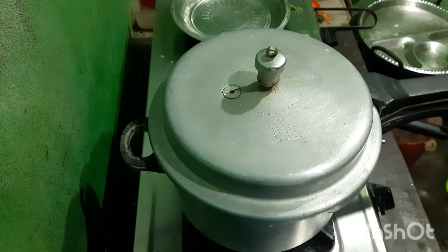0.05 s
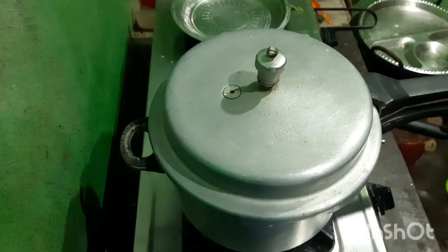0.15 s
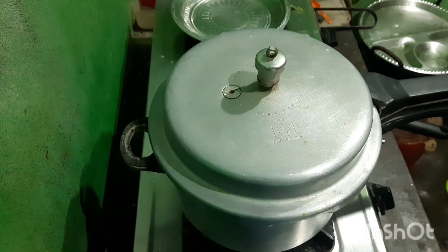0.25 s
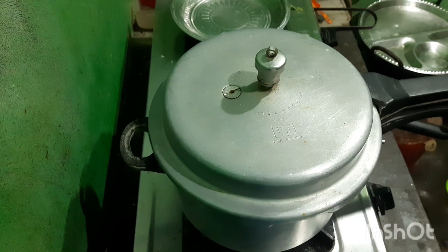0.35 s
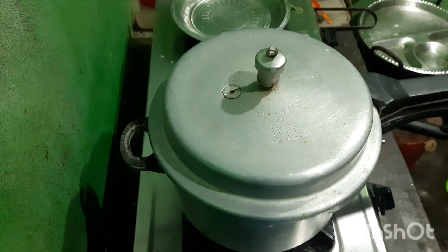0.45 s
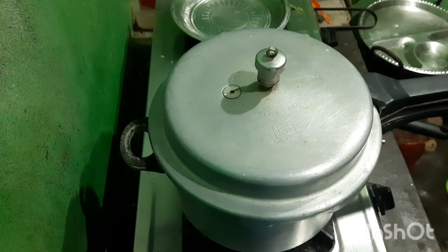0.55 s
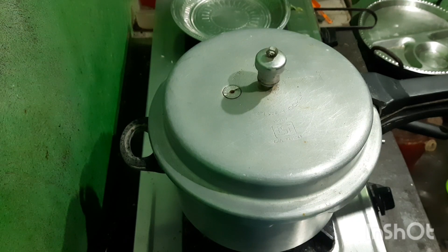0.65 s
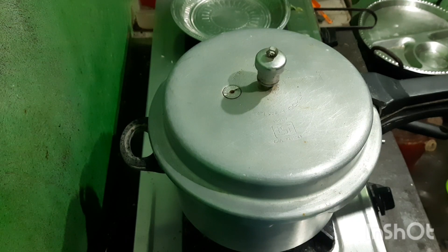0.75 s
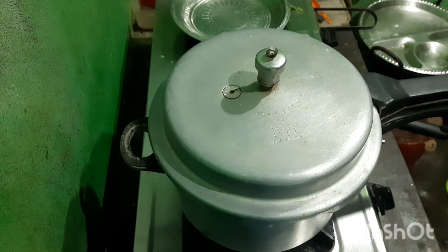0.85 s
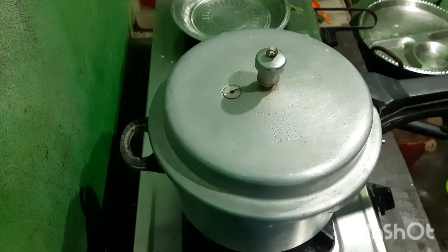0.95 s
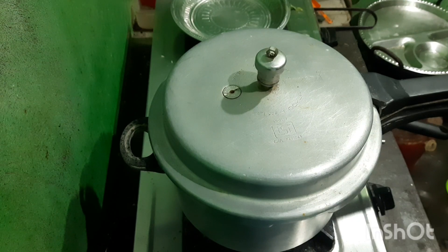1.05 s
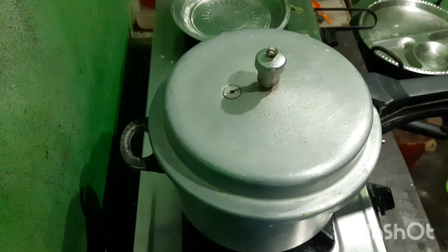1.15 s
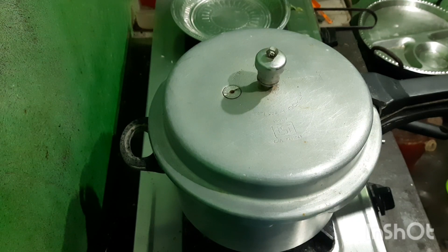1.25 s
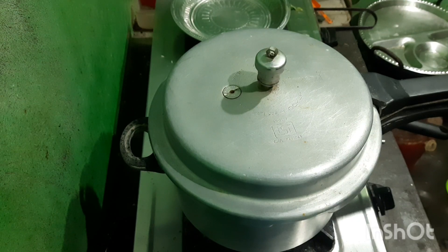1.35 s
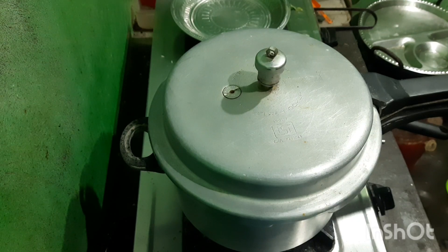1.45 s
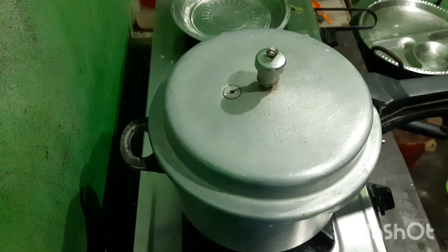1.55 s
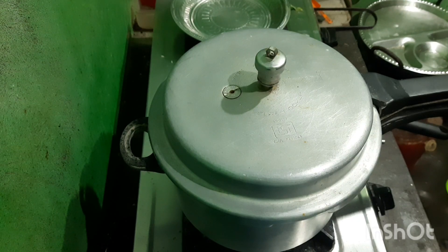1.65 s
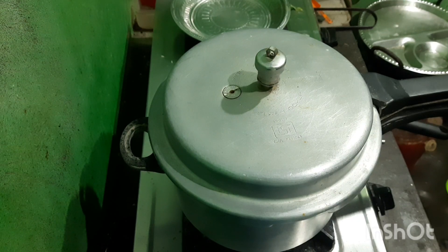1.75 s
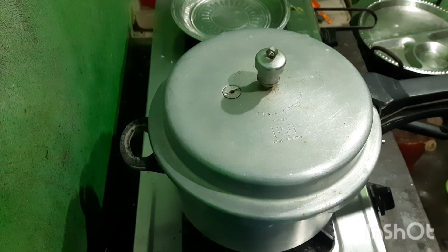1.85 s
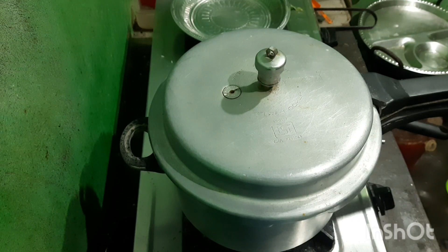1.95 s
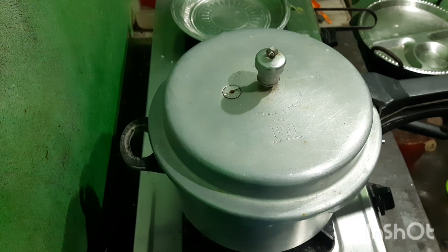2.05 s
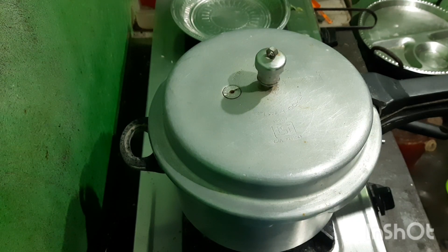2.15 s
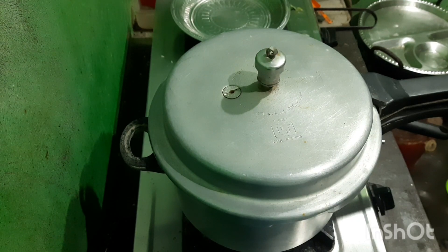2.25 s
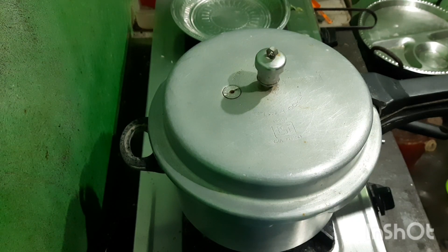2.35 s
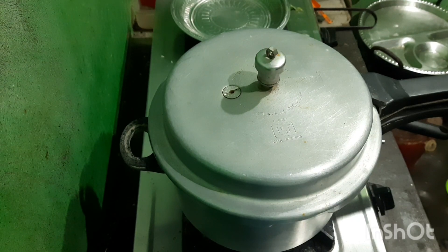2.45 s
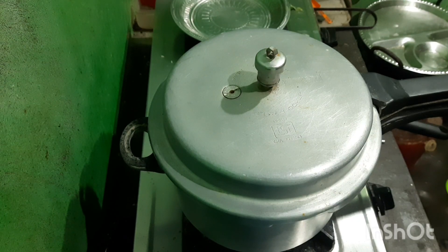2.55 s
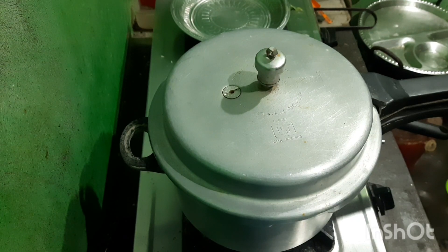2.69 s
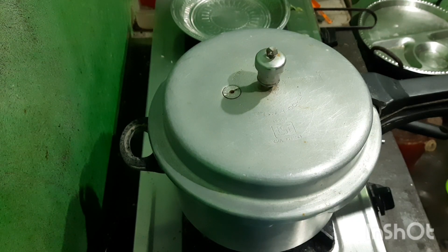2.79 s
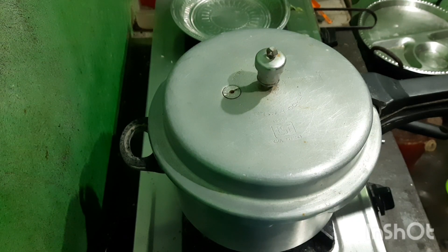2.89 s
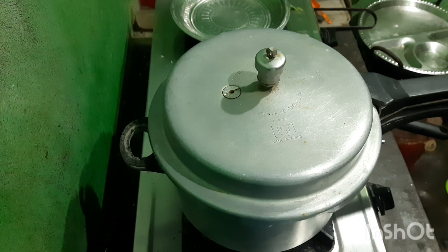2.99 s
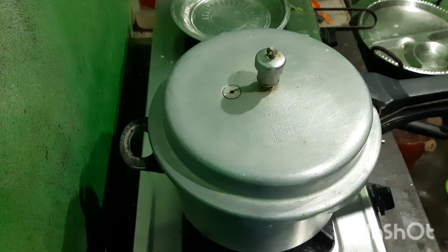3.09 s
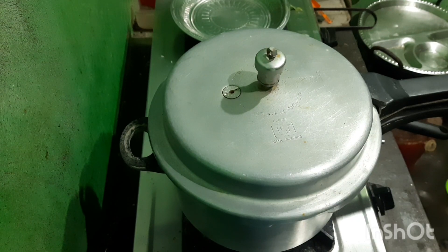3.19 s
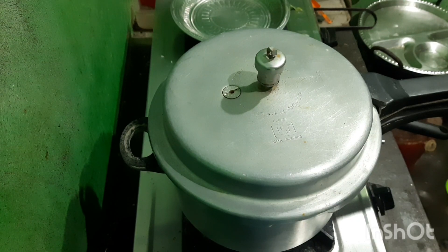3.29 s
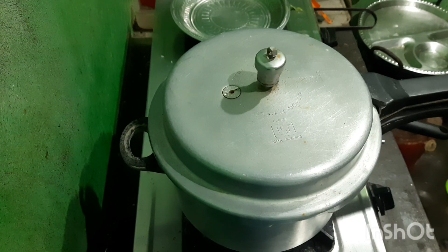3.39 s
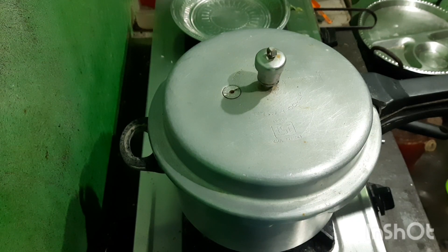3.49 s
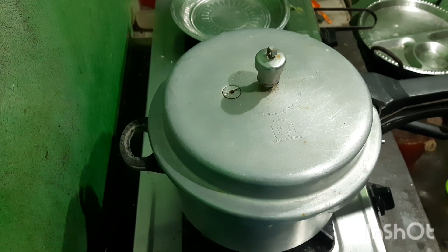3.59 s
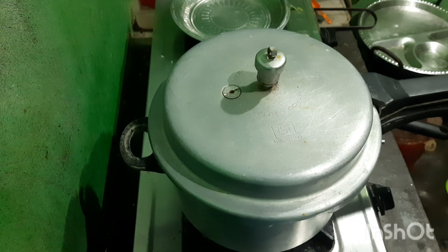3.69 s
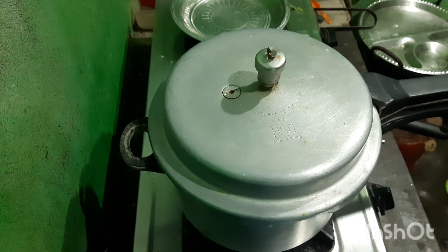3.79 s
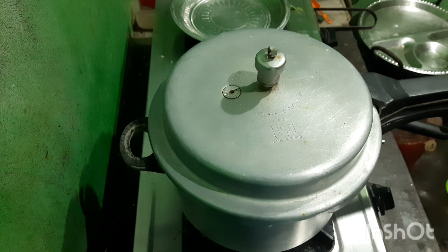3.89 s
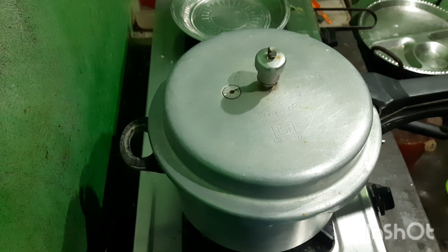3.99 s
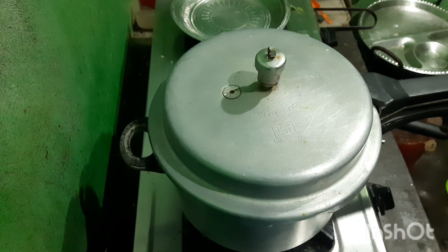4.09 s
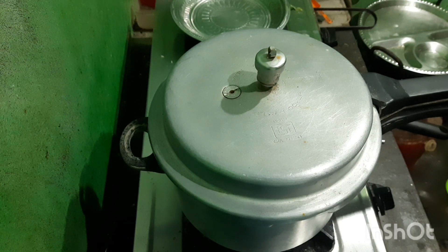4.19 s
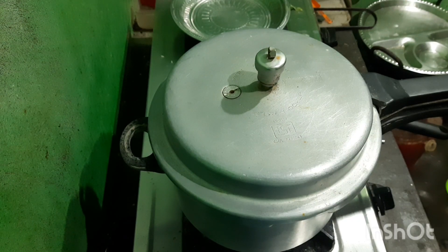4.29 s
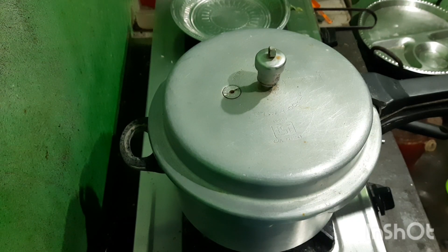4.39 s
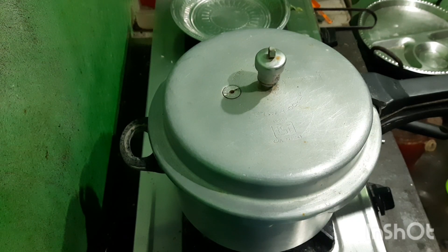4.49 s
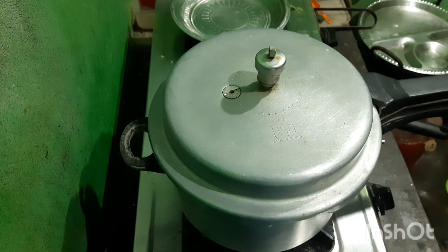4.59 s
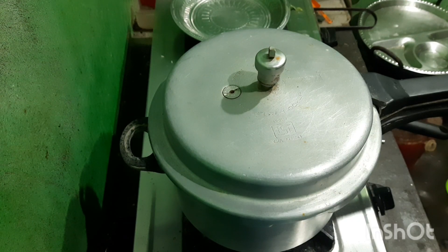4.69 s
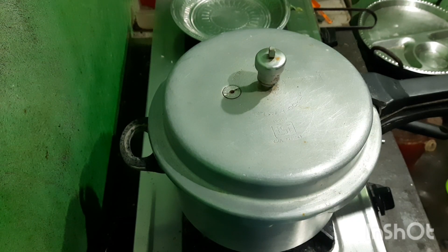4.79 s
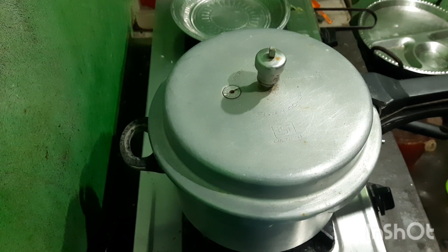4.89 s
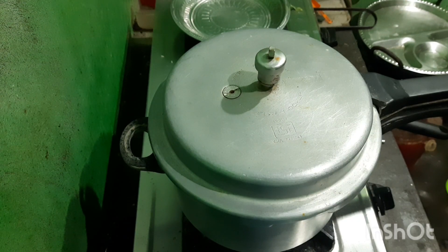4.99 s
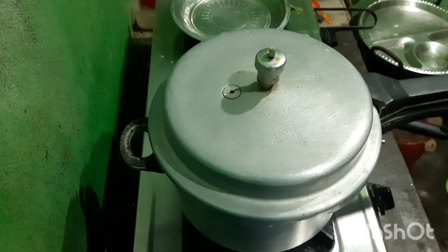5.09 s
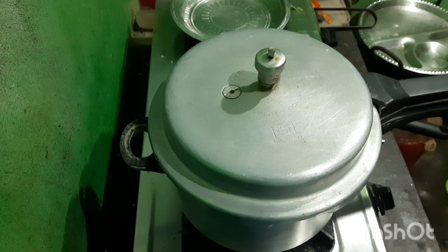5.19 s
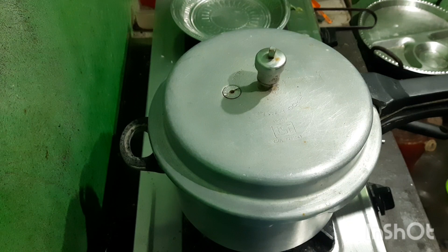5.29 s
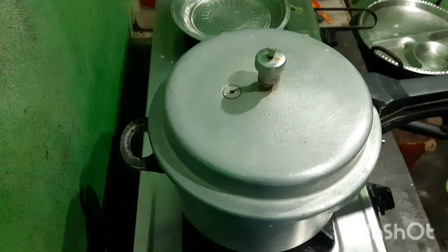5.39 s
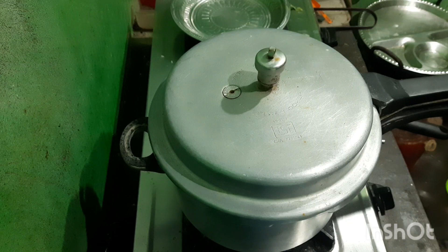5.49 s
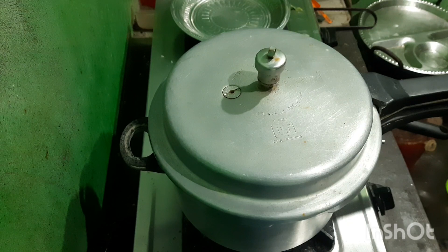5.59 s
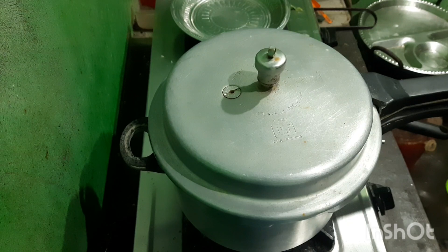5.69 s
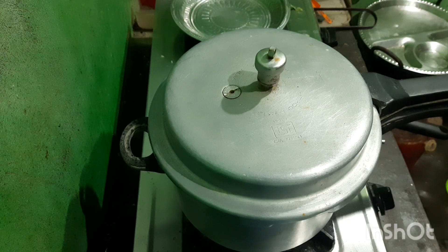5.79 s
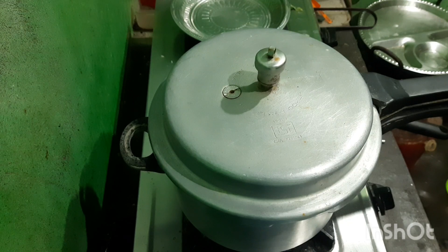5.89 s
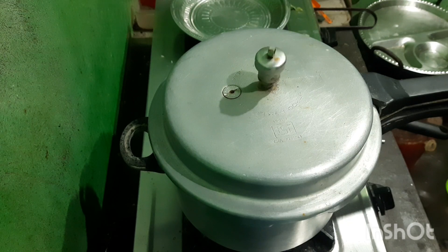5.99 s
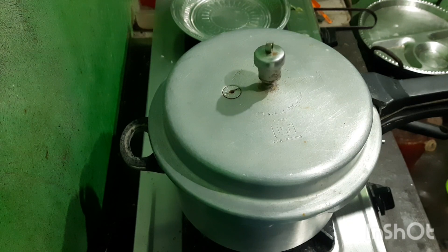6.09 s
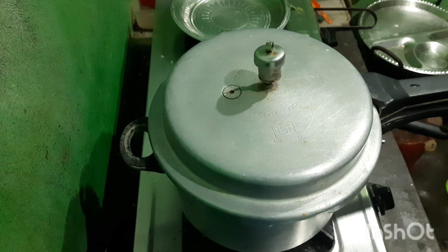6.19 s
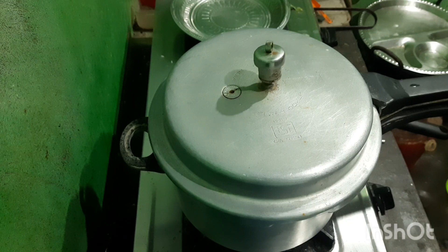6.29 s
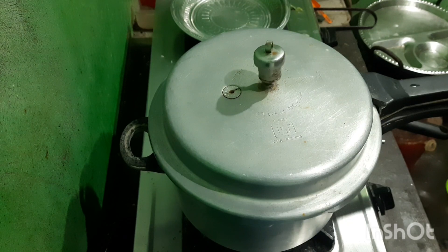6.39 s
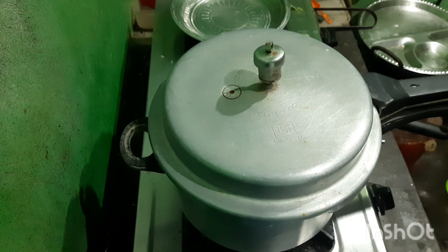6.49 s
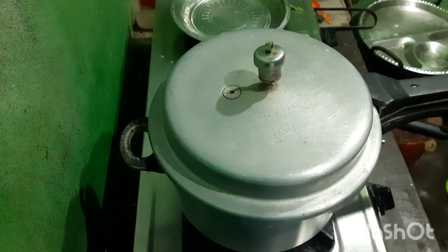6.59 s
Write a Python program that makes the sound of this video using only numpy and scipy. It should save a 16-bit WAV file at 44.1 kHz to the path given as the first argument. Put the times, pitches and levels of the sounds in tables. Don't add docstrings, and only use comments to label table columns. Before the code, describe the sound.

A close stereo view of a pressure cooker on a gas ring in a small kitchen. For the first 0.24 s there is only a thin leak of steam and a soft, low flame rumble. Then the hiss jumps in and flutters in quick airy puffs, roughly ten per second, growing gradually until about 2.8 s. Around 3 s it dips briefly, then the rocking widens: puffs become brighter, fuller and slower, about seven to ten per second, with fine fizz and hiss still leaking between them. From 5 s they are markedly louder and irregular, with wet spits and tiny chokes up to 5.8 s. At about 6 s the weight lifts and the pulses merge into a continuous broad roar. Draught slams the microphone in thumps and ragged gusts, stronger on the right, burying the burner. Short room reflections surround it; it stops at 6.65 s, still roaring.

```python
import sys
import numpy as np
from scipy import signal
from scipy.io import wavfile
from scipy.ndimage import uniform_filter1d

SR = 44100
rng = np.random.default_rng(int(sys.argv[2]) if len(sys.argv) > 2 else 0)


def wav_record(signal):
    frames = np.transpose(np.atleast_2d(signal))
    bounded = np.clip(frames, -1, 1)
    quanta = np.round(bounded * 32767).astype(np.int16)
    wavfile.write(sys.argv[1], SR, quanta)


def field_ratio(decibels):
    return 10 ** (np.asarray(decibels, dtype=float) / 20)


N = 293265

# freq_hz, density_db_per_hz
FLAME_SPECTRUM = [(15, -45), (30, -22), (57, -13), (95, -3), (130, -5), (155, -6), (220, -1), (270, -3),
                  (400, -1), (440, -4), (560, -9), (650, -15), (900, -19), (1300, -40)]
# freq_hz, width_hz, gain_db
ROOM_MODES = [(43, 10, 8), (82, 18, 17), (107, 13, 17), (181, 12, 15), (198, 14, 9), (246, 10, 9),
              (302, 14, 9), (326, 7, 5), (342, 9, 10), (378, 14, 4), (515, 25, 4), (550, 15, 4)]
# freq_hz, likeness_0_1
ROOM_LIKENESS = [(60, 0.96), (130, 1), (290, 0.93), (640, 0.56), (1410, 0.94), (3100, 0.54), (6820, 0.35),
                 (15000, 0.21)]
# start_s, freq_hz, length_s, level_db
FLAME_SURGES = [(.15, 200, 0.077, -48), (1.09, 220, 0.071, -48), (2.2, 78, 0.14, -39),
                (4.26, 46, 0.19, -55), (1.4, 178, 0.25, -46.5), (3.5, 183, 0.42, -43.5),
                (4.95, 186.3, 0.39, -45.5), (1.42, 130, 0.11, -40.5), (0.24, 106, 0.16, -46),
                (4.45, 184, 0.23, -57), (4.5, 420, 0.037, -57)]
# centre_s, length_s, left_db, right_db
GUSTS = [
    (6.056, 0.018, -27, -25),
    (6.11, 0.027, -28, -22.5),
    (6.145, 0.037, -33, -17),
    (6.207, 0.036, -25, -15),
    (6.264, .03, -28, -20),
    (6.343, 0.047, -25, -24),
    (6.41, 0.051, -28.5, -35),
    (6.517, 0.016, -27, -21),
    (6.585, 0.044, -47, -19),
    (6.65, 0.031, -35, -18),
]
# centre_s, pressure
THUMPS = [
    [(5.9825, -.26), (6.1087, -.12), (6.1912, -.16), (6.3146, -.25), (6.423, -.2), (6.4316, -.2),
     (6.5091, -.25), (6.5448, -.24)],
    [(6.044, -.25), (6.1168, .35), (6.135, .35), (6.183, -.35), (6.2124, -.25), (6.3494, .5), (6.3732, .52),
     (6.517, -.33), (6.5838, .25), (6.626, .28), (6.639, .28)],
]
# top_s, hiss_db
PUFFS = [(.278, -29.5), (.394, -28.5), (.505, -27.5), (.578, -27.5), (.667, -28), (.76, -26.5),
         (.885, -27), (.965, -27), (1.055, -25.5), (1.161, -26.5), (1.275, -23), (1.36, -26),
         (1.476, -23.5), (1.561, -23.5), (1.669, -24), (1.774, -25), (1.885, -23.5), (1.984, -24.8),
         (2.068, -26), (2.164, -25.5), (2.252, -25.5), (2.385, -25.5), (2.506, -23), (2.613, -22.5),
         (2.717, -23.8), (2.815, -21.5),
         (2.969, -27), (3.053, -24), (3.182, -24), (3.296, -23.5), (3.385, -25), (3.466, -23.2),
           (3.577, -23), (3.672, -23), (3.814, -24), (3.932, -22), (4.05, -22), (4.196, -21),
           (4.346, -23.5), (4.457, -20.5), (4.607, -22.5), (4.745, -24.5), (4.859, -21.5), (5.011, -19),
           (5.16, -20), (5.415, -17.5), (5.6, -17.5), (5.672, -17), (5.887, -17), (5.95, -17.5),
           (6.05, -17.5), (6.134, -16.5)]
# time_s, hiss_db
SEATED_HISS = [(.3, -28.5), (1.5, -31), (3, -28), (4.5, -27.8), (5, -24.5), (5.5, -29), (5.8, -22.5),
               (6, -20)]
# centre_s, rise_db, length_s
SPITS = [(3.12, -3, .02), (4.983, 1.5, 0.01), (5.068, -3, .015), (5.117, 4, .025), (5.305, 2.5, 0.026),
         (5.47, 5, 0.029), (5.552, -4, 0.024), (5.594, 4, 0.008), (5.597, -6.5, 0.012), (5.709, 7, 0.0063),
         (5.719, -3.5, 0.014), (5.792, -4.5, 0.011), (6.424, -0.5, 0.011), (6.555, 1, .015)]
# time_s, opening_0_1, aim_left_db
GAP = [(.24, 0, -4), (.3, 0.25, 1.5), (1.8, 0.13, 1), (3, 0.28, -2.5), (3.4, .75, -2.5), (4.7, 0.67, -2.5),
       (5.7, 0.95, -0.5), (6.05, 0.6, -1), (6.65, 0.6, -1)]
# freq_hz, density_db_per_hz
HISS_SPECTRUM = [(350, -32), (550, -24.5), (800, -15), (2000, -14), (2600, -13), (3700, -12.5), (5200, -12),
                 (5700, -8), (8400, -6), (9000, -6), (11400, -5), (15000, -6), (15800, -8.5)]
# freq_hz, width_hz, gain_db
VENT_MODES = [(3270, 1060, 3.5), (4450, 140, 3), (5730, 670, 3.5), (6610, 560, 2.5), (9640, 1560, 4.5),
              (12580, 880, 4), (14600, 610, 4)]
# freq_hz, left_minus_right_db
PORT_BALANCE = [(60, -1), (120, 2), (240, -1), (480, 5.5), (950, 0.5), (1890, -2), (3770, 4.5), (7520, 2),
                (15000, 8)]
# freq_hz, likeness_0_1
JET_LIKENESS = [(400, 1), (1150, 0.31), (2000, 0.77), (2850, 1), (3600, 0.33), (4300, 0.52), (5000, 0.48),
                (6500, 0.98), (7500, 0.23), (9800, 0.88), (11900, 0.3), (13200, 0.8), (15000, 1)]
# freq_hz, phase_rad
PORT_PHASE = [(4500, -0.11), (5300, -1.95), (6700, -0.87), (8800, 1), (11300, -0.016), (12100, -1.4),
              (13200, -1), (14400, -1.7), (15600, -1.8)]

SEATS_AT_SHARE, TURN_S, DROP_S = 0.48, 0.077, 0.025
LEAK_DB, OPENS_S, FIRST_DB, LAST_DB, LIFT_S = -41, .2435, -28, -18.5, 6.04
TREBLE_DB, TOP_DB, ROAR_DB, AIR_DB = (-4, 5.5), (3, -1.5), (1, 1), (-0.5, 0.5)
LEAK_AIR_DB, LIFTED_AIR_DB = 5.5, 0
RING, RING_PER_S, LEAK_RING, RING_LIFTED = 1.56, -0.12, 0.5, 0.43
VENT_STRETCH_SHARE = 0.021
ROAR_SAG_DB_PER_S, LEAK_ROAR_DB = -0.95, 2
ROAR_DB_PER_GUST_DB, CALM_DB, LULL_ROAR_DB = 2.5, -19, -3.5
STEADY_DRAUGHT_DB, THUMP_SCALE_MS = (-29.5, -33), (1, 0.98)
KITCHEN_T60_S, KITCHEN_CUTOFF_HZ, KITCHEN_DB = 0.18, 2220, -0.5
FLAME_DB, FLAME_SAG_DB_PER_S = -42.5, -0.49
DUCK_FROM_DB, DUCK_SHARE = -24, .5


def evened(x):
    return x / np.sqrt(np.mean(x ** 2) + 1e-20)


def read(points, hz):
    f, value = np.transpose(points)
    return np.interp(np.log(hz + 1), np.log(f + 1), value)


def humps(modes, hz):
    return sum(db / (1 + (2 * (hz - f) / width) ** 2) for f, width, db in modes)


def patches(bins, frames, wide, long):
    z = rng.standard_normal((frames, bins)).T
    z = uniform_filter1d(z, wide, 0)
    return evened(uniform_filter1d(z, long, 1))


def pair(field_db, likeness, phase_rad, size):
    a, b, c, d = rng.standard_normal(field_db.shape[:0:-1] + (4,)).T
    likeness = np.clip(likeness, -1, 1)[:, None]
    left = a + 1j * b
    shared = likeness * left * np.exp(1j * phase_rad)[:, None]
    right = shared + np.sqrt(1 - likeness ** 2) * (c + 1j * d)
    spectra = np.array([left, right]) * field_ratio(field_db)
    return signal.istft(spectra, nperseg=size, noverlap=size * 3 // 4)[1][:, :N]


def flame_db(t):
    coarse = t[::100]
    smooth_db = uniform_filter1d(lift_db(coarse), size=SR // 300)
    loud_db = np.interp(t, coarse, smooth_db)
    duck_db = DUCK_SHARE * np.maximum(loud_db - DUCK_FROM_DB, 0)
    return FLAME_DB + FLAME_SAG_DB_PER_S * t - duck_db


def burner():
    size, hop = 8192, 2048
    hz, t = np.fft.rfftfreq(size, 1 / SR), np.arange(N // hop + 5) * hop / SR
    field = (read(FLAME_SPECTRUM, hz) + humps(ROOM_MODES, hz))[:, None]
    field = field + 1.2 * patches(len(hz), len(t), 8, 3)
    side = read(PORT_BALANCE, hz)[:, None] / 2
    field = np.array([field + side, field - side])
    rumble = pair(field, read(ROOM_LIKENESS, hz), 0 * hz, size)
    return field_ratio(0.8 + flame_db(np.arange(N) / SR)) * evened(rumble)


def booms():
    t = np.arange(N) / SR
    return sum(field_ratio(db) * np.exp(-((t - s) / length) ** 2) * np.sin(2 * np.pi * hz * t)
               for s, hz, length, db in FLAME_SURGES)


def kitchen(x):
    t = np.arange(SR // 2) / SR
    tail = rng.standard_normal((2, len(t))) * field_ratio(-60 * t / KITCHEN_T60_S)
    tail /= np.linalg.norm(tail, axis=1, keepdims=True)
    dull = signal.sosfilt(signal.butter(2, KITCHEN_CUTOFF_HZ, fs=SR, output="sos"), x.mean(0))
    return field_ratio(KITCHEN_DB) * signal.oaconvolve(dull[None], tail, axes=1)[:, :N]


def walls(x):
    at = np.arange(40, 5000, 20) + rng.integers(0, 20, (2, 248))
    echoes = rng.choice([-1., 1.], at.shape) * field_ratio(-60 * at / SR / 0.13)
    taps = np.zeros((2, 5100))
    np.put_along_axis(taps, at, echoes, 1)
    taps /= np.linalg.norm(taps, axis=1, keepdims=True)
    return signal.oaconvolve(x.mean(0)[None], taps, axes=1)[:, :N]


def draught_db(port, t):
    power = sum(field_ratio(row[2 + port]) ** 2 * np.exp(-((t - row[0]) / row[1]) ** 2) for row in GUSTS)
    return 10 * np.log10(power + field_ratio(STEADY_DRAUGHT_DB[port]) ** 2)


def buffet(port, per_s, short_ms, long_ms, steep, spread_db, sharpen, lopsided):
    front_s = THUMPS[port][0][0]
    first = round((THUMPS[0][0][0] - .1) * SR)
    t, n = np.arange(first, N) / SR, N - first
    gust_db = draught_db(port, t)
    leak = signal.butter(3, 60, "high", fs=SR, output="sos")
    push = np.zeros(n)
    for ms in np.geomspace(short_ms, long_ms, num=8):
        u = np.linspace(0, 4, round(4 * ms * SR / 1000))
        bump = u * np.exp(-u ** 1.97)
        size = rng.standard_normal(n) + lopsided * (ms < .4)
        hits = (rng.random(n) < per_s / SR) * size * field_ratio(spread_db * rng.standard_normal(n))
        hits *= field_ratio(sharpen * (gust_db - gust_db.max()) * np.log(long_ms / ms))
        push += ms ** steep * signal.oaconvolve(hits, bump)[:n]
    push = signal.sosfilt(leak, push)
    push /= np.sqrt(uniform_filter1d(push ** 2, 2000) + 1e-12)
    thumps = sum(p * np.exp(-((t - s) * 2000 / THUMP_SCALE_MS[port]) ** 2) for s, p in THUMPS[port])
    pressure = field_ratio(gust_db) * push * (t > front_s) + 1.13 * signal.sosfilt(leak, thumps)
    return np.r_[np.zeros(first), pressure]


def lift_db(t):
    s, top = np.transpose(PUFFS)
    gap_s, lower = np.diff(s), np.minimum(top[1:], top[:-1])
    seat_s = s[:-1] + SEATS_AT_SHARE * gap_s
    fallen = np.clip((gap_s - TURN_S) / DROP_S, .1, 1)
    fall_db = np.minimum(np.interp(seat_s, *np.transpose(SEATED_HISS)) - lower, -.5)
    seat = lower + fallen * fall_db
    at = np.r_[OPENS_S, np.c_[s[:-1], seat_s].ravel(), s[-1], N / SR]
    level = np.r_[FIRST_DB, np.c_[top[:-1] + .3, seat].ravel(), top[-1], LAST_DB]
    index = np.arange(len(at))
    step = np.interp(t, at, index)
    eased = np.floor(step) + np.sin(np.pi / 2 * (step % 1)) ** 2
    spits = sum(db * np.exp(-((t - s) / length) ** 2) for s, db, length in SPITS)
    return np.where(t < OPENS_S, LEAK_DB, np.interp(eased, index, level) + spits)


def colour(t):
    s, opening, aim = np.transpose(GAP)
    opening, lean = np.interp(t, s, opening), np.interp(t, s, aim)
    leaking, lifted = t < OPENS_S, t > LIFT_S
    treble, top, roar = (narrow + (wide - narrow) * opening
                         for narrow, wide in (TREBLE_DB, TOP_DB, ROAR_DB))
    gusty = np.maximum(ROAR_DB_PER_GUST_DB * (draught_db(1, t) - CALM_DB), LULL_ROAR_DB)
    roar = np.where(lifted, gusty, roar + ROAR_SAG_DB_PER_S * t + LEAK_ROAR_DB * leaking)
    ring = np.where(lifted, RING_LIFTED, RING + RING_PER_S * t + LEAK_RING * leaking)
    return treble, top, roar, lean, ring


def air_db(t):
    opening = np.interp(t, *np.transpose(GAP)[:2])
    fizz = AIR_DB[0] + (AIR_DB[1] - AIR_DB[0]) * opening
    return fizz + LEAK_AIR_DB * (t < OPENS_S) + LIFTED_AIR_DB * (t > LIFT_S)


def steam():
    size, hop = 256, 64
    hz, t = np.fft.rfftfreq(size, 1 / SR), np.arange(N // hop + 5) * hop / SR
    treble, top, roar, lean, ring = colour(t)
    stretch = 1 + VENT_STRETCH_SHARE * (np.interp(t, *np.transpose(GAP)[:2]) - .5)
    swing = lift_db(t) - uniform_filter1d(lift_db(t), 200)
    high = read([(7000, 0.13), (9500, 1.)], hz)[:, None]
    low = read([(1800, 0.72), (3500, 0.2)], hz)[:, None]
    field = (read(HISS_SPECTRUM, hz) - 40 * (hz < 350))[:, None]
    field = field + humps(VENT_MODES, hz[:, None] / stretch) * ring
    field = field + read([(10500, 0.052), (12000, 0.84)], hz)[:, None] * top
    field = field + read([(12900, 0.11), (13900, 0.84)], hz)[:, None] * air_db(t)
    field = field + high * (treble + 0.23 * swing) + low * (roar - 0.26 * swing)
    field = field + 0.94 * patches(len(hz), len(t), 8, 40) + 0.57 * patches(1, len(t), 1, 3)
    side = (read(PORT_BALANCE, hz)[:, None] + high * lean) / 2
    field = np.array([field + side, field - side])
    power = (field_ratio(field[:, hz > 2500]) ** 2).mean((0, 1))
    field -= 10 * np.log10(uniform_filter1d(power, 12))
    jet = pair(field, read(JET_LIKENESS, hz), read(PORT_PHASE, hz), size)
    return field_ratio(0.78 + lift_db(np.arange(N) / SR)) * evened(jet)


def scene():
    jet = steam()
    hiss = field_ratio(-.5) * jet + field_ratio(-8) * walls(jet) + kitchen(jet)
    left = buffet(0, per_s=160., short_ms=0.032, long_ms=3.2, steep=-0.055, spread_db=1.6,
                  sharpen=.05, lopsided=3.2)
    right = buffet(1, per_s=130., short_ms=0.069, long_ms=1.42, steep=0.07, spread_db=0.9,
                   sharpen=0.08, lopsided=.3)
    return hiss + burner() + booms() + np.array([left, right])


def low_pass(x):
    return signal.sosfilt(signal.butter(12, 16130, fs=SR, output="sos"), x)


def record(dry):
    soft = 0.98 * np.tanh(dry / 0.92)
    edge = signal.firwin(1023, 15760, window=("kaiser", 9), fs=SR)
    mix = signal.oaconvolve(soft, edge[None], "same")
    return low_pass(mix)


dry = scene()
out = record(dry)
wav_record(out)
```